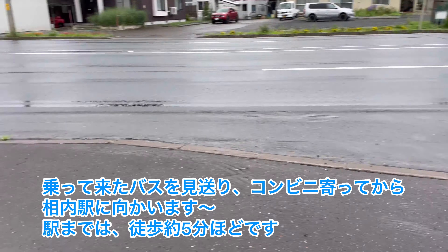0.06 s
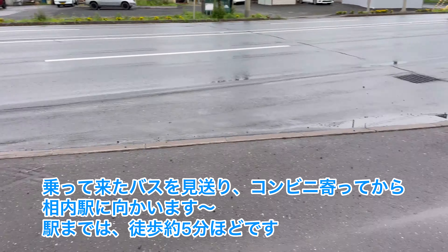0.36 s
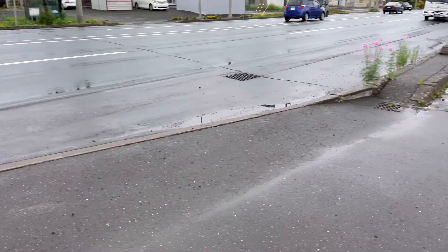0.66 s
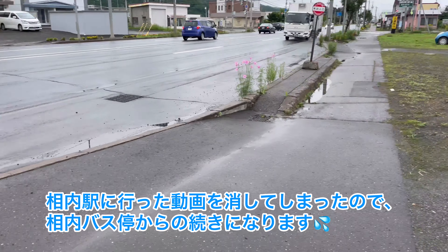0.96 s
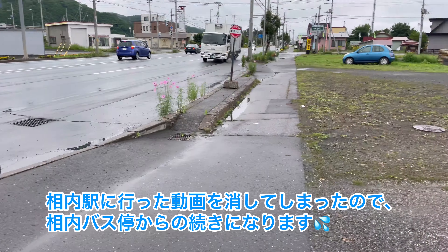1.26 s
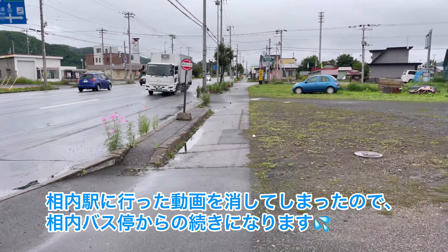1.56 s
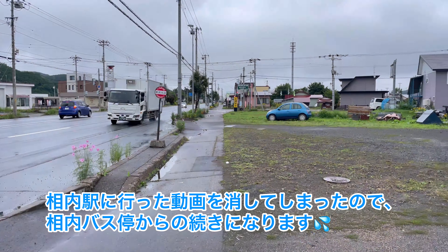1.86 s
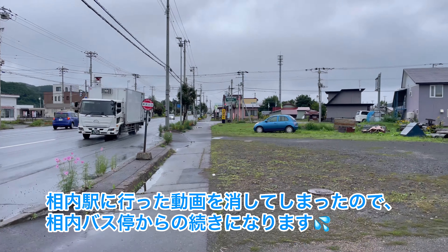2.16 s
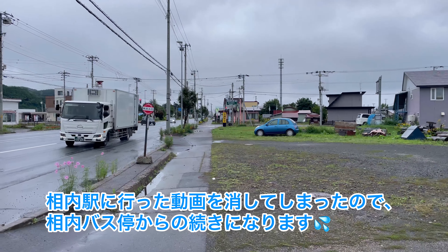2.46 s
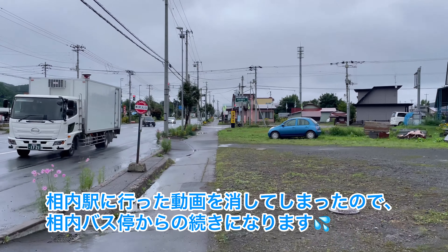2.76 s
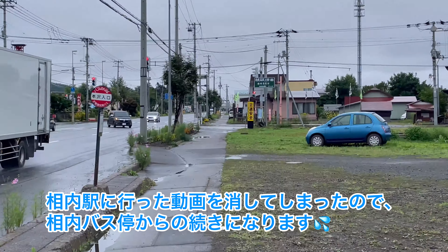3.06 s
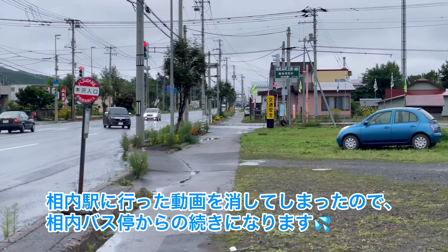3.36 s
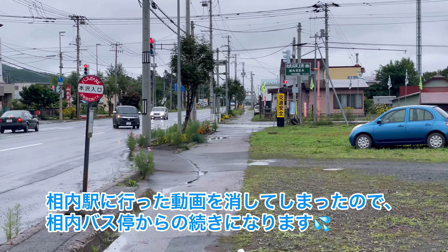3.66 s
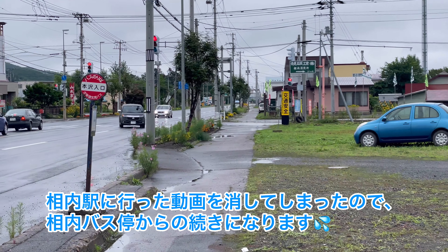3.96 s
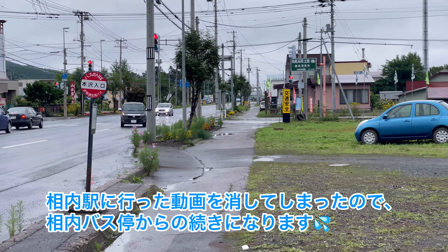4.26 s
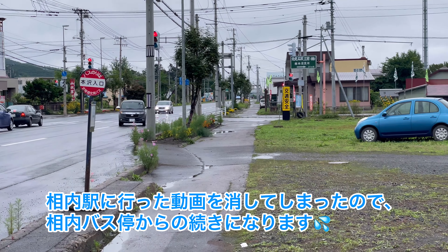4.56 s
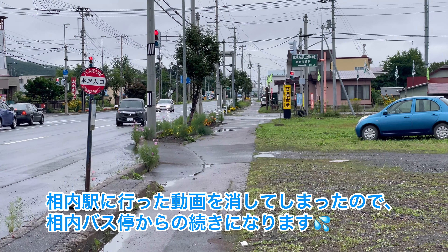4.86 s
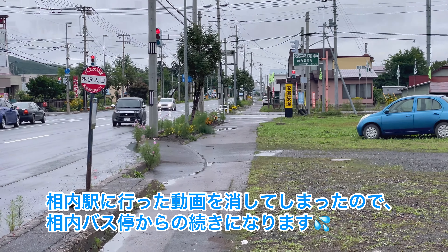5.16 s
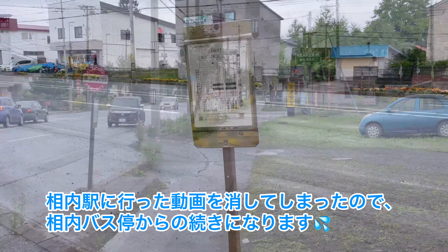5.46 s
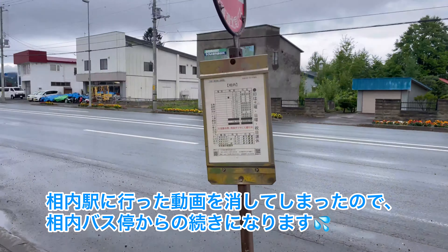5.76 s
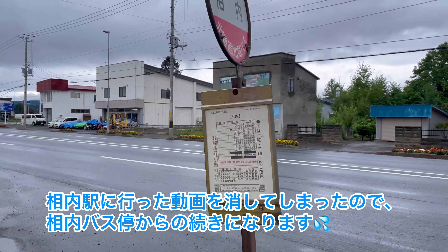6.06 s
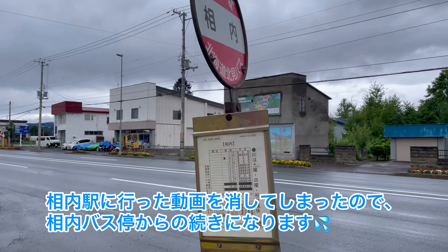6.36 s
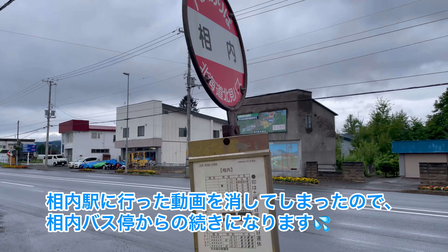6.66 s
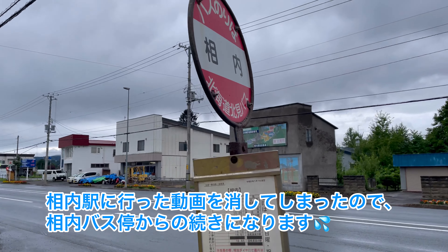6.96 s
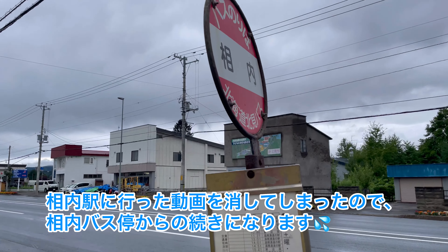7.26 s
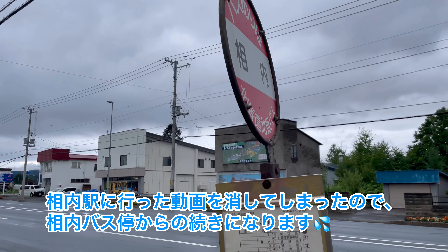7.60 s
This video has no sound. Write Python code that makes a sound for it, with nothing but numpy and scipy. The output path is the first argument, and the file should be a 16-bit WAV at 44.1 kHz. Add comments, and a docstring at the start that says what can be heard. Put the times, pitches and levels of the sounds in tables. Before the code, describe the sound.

At the start a bus pulls away on the left, its engine humming and growling over wet tyre hiss. The hum rises until about 0.8 seconds, then sags and is gone by 1.7, while a small car swishes faintly past. From about 1 second a truck approaches on the wet road, its hollow, sweeping tyre hiss and low rumble growing steadily. A diesel hum and a hoarse gear whine join in by 3 seconds. The truck is loudest and closest at around 4 to 4.8 seconds, with roaring tyres, bright spray and short spits of water and grit, the sharpest near 3.9. The whine drops in pitch as it passes. Around 5 seconds the truck fades and a following car's tyres hiss briefly. From about 5.8 seconds to the end, only quiet distant traffic drones and hisses. Soft, low wind thumps nudge the microphone now and then.

```python
"""A truck passes on a wet road

From the pavement, a hand-held phone hears a bus drone away on the left, then turns past a small car towards a
box truck. The truck passes close by: its diesel hums, its gears whine, its body rumbles and its tyres roar,
hiss and spray. The holder's body throws back a short echo that sweeps with the turn. The next car comes through
as the truck leaves; then the scene changes to steady far traffic. Water and grit spit, and wind nudges the
microphone."""
import sys
import numpy as np
from scipy import signal
from scipy.fft import rfft, irfft
from scipy.io import wavfile
from scipy.ndimage import uniform_filter1d, map_coordinates

SR = 44100
rng = np.random.default_rng(int(sys.argv[2]) if len(sys.argv) > 2 else 0)


def put_to_file(sound):
    """Save the sound as 16-bit audio at rate SR, in the file named by the first command-line argument."""
    columns = np.atleast_2d(sound).T  # one column per channel
    safe = np.clip(columns, -1, 1)
    whole_steps = np.round(safe * 32767)
    wavfile.write(sys.argv[1], SR, whole_steps.astype(np.int16))


N = 336483
T = np.arange(N) / SR
HZ = np.fft.rfftfreq(N, 1 / SR)

# Sound from ahead and from the left. Each row: frequency in Hz, left channel's lead in radians. The last rows,
# above about 12 kHz, only set how the topmost treble lines up between the channels.
FROM_AHEAD = [(0, 0), (1030, 1.4), (1460, 0.3), (1890, -0.1), (2930, 0.5), (5170, 0.6), (5770, -1.6),
              (6890, -0.6), (7490, -2.2), (7920, -2.1), (8350, -3.0), (12200, -5.4), (12600, -6.3),
              (15200, -6.3)]
FROM_LEFT = [(0, 0), (450, 0.5), (1200, 3.5), (2500, 5.5), (3500, 8.5), (4200, 5.5), (5300, 8), (5700, 3),
             (6700, 10), (7300, 3.5), (8600, 2.5), (12000, 5), (12600, -39.5)]
# How much louder the left channel is. Each row: frequency in Hz, left minus right in dB.
LEFT_BOOST = [(60, 3), (250, 2.5), (700, 3.5), (1300, 2.5), (2300, 0.5), (8000, 0)]
# The tone colour of each noise. Each row: frequency in Hz, relative level in dB.
FAR_DRONE = [(22, -28), (38, -5), (68, 1.5), (115, -7), (170, 1.5), (240, 2), (330, 0.5), (420, -9),
             (620, -5.5), (800, -2.5), (930, -4), (1080, -6.5), (1500, -11.5), (2200, -14.5)]
FAR_HISS = [(1000, -22), (1300, 1), (1650, -3.5), (2150, -0.5), (2800, -3.5), (3600, -8), (4500, -7),
            (5300, -7), (5900, -13), (7500, -11), (9300, -11), (11500, -13), (13000, -23), (15500, -38)]
BUS_HISS = [(900, -25), (1200, 6), (1650, 4.5), (2500, 1.5), (3400, -5.5), (4000, -4), (5100, -15),
            (5700, -11), (6500, -6), (7400, -4.5), (8500, -19), (9800, -6.5), (11500, -12), (13000, -28),
            (15500, -33)]
SMALL_CAR_TYRES = [(700, -20), (950, 6.5), (1150, 3), (1500, -13), (2100, -5), (2900, -23), (4000, -22)]
NEXT_CAR_TYRES = [(800, -22), (1050, 7), (1320, 7), (1700, 3), (2400, -4), (3400, -6), (4300, -9),
                  (5200, -8), (5900, -11), (7500, -16), (11500, -15), (14000, -32)]
BODY_RUMBLE = [(20, -30), (30, -21), (40, -6), (60, -0.5), (85, 4.5), (160, 1), (190, -2.5), (250, -10.5),
               (400, -49)]
TYRE_ROAR = [(130, -30), (200, -1), (270, 3), (420, -5), (540, -7), (720, -5), (1020, -5.5), (1250, -11),
             (2000, -51)]
TREAD_HISS = [(700, -36), (1050, -8), (1350, 1), (2050, 1), (2800, -2.5), (3700, -4), (5200, -6),
              (5700, -16.5), (8000, -38)]
SPRAY_HISS = [(4000, -24), (5200, -0.5), (5750, 1.5), (6600, 2.5), (7400, 1), (8000, 2), (9300, 4.5),
              (11500, -3.5), (13000, -7.5), (15500, -20)]
# Far cars hissing. Each row: time in seconds, level in dB, treble boost in dB, echo delay in ms.
FAR_CARS = [(5.6, -43.5, 1.5, 1.66), (6.2, -49, 3, 1.36), (6.55, -50.5, 0, 1.54), (6.85, -52, 1, 1.53),
            (7.1, -51.5, 2, 1.58), (7.35, -52.5, 0, 1.7), (7.63, -53, 1, 1.62)]
# Wind on the microphone. Each row: time in seconds, peak in dB, pitch in Hz, decay in seconds.
WIND_THUMPS = [(.33, -19.5, 80.5, 0.038), (.95, -17, 70, 0.073), (1.328, -21, 86, 0.028),
               (1.509, -28, 57.8, 0.027), (2.519, -22, 70, 0.038), (2.76, -23, 91, 0.088),
               (2.92, -24.5, 86.6, 0.055), (4.52, -18.5, 55, 0.12), (5.08, -27, 85, 0.056),
               (5.778, -27, 79.2, 0.019), (5.79, -33.5, 180, .04), (5.89, -33, 59.6, 0.055),
               (6.96, -41, 70, .035)]
# Water and grit. Each row: start in seconds, peak in dB, pitch in Hz, width in Hz, decay in seconds.
SPLASHES = [(.052, -26, 2800, 3000, .004), (.842, -25, 1950, 550, .009), (3.861, -12.8, 3000, 4200, .008),
            (3.897, -19, 3100, 900, .012), (4.275, -22, 2950, 450, .015), (4.345, -20, 2700, 300, .048),
            (4.54, -26.5, 3800, 400, .13), (4.8, -24, 2100, 500, .035), (6.970, -38, 2600, 800, .006),
            (6.985, -39.5, 4300, 1500, .008)]
# The echo off the holder's body. Each row: time in seconds, delay in ms, strength as a factor.
BODY_ECHO = [(.2, .62, .1), (.5, .74, .35), (.84, 1.02, .44), (1.0, 1.12, .48), (1.3, 1.35, .46),
             (1.48, 1.46, .68), (1.8, 1.48, .7), (2.0, 1.55, .75), (2.3, 1.57, .78), (2.6, 1.53, .78),
             (2.8, 1.51, .42), (3.6, 1.48, .32), (4.15, 1.48, 0)]
# The bus pulling away. Each row: time in seconds, firings per second, level in dB.
BUS_REVS = [(0.0, 95.1, -33), (0.3, 95.26, -32.5), (0.44, 99.1, -28), (0.62, 103.4, -28.5),
            (0.8, 105.2, -27), (1.12, 101, -30.5), (1.35, 85.8, -37), (1.52, 79.3, -36)]
# The bus's exhaust tones. Each row: multiple of the firing rate, relative level in dB.
BUS_TONES = [(.5, -12), (1, -1), (1.5, -13), (2, -17), (2.25, -17), (2.5, -18), (3, -15), (4, -24)]
# The truck's six cylinders fire three times a turn. Each row: multiple of the shaft rate, level in dB.
TRUCK_TONES = [(2, -8), (3, 1), (4, -2.5), (5, -8), (6, -13), (7, -4.5), (11, -14)]
# Air ringing in the tread grooves. Each row: pitch in Hz, width in Hz, relative level in dB.
GROOVES = [(1448, 260, 0.5), (1995, 260, -3.5)]
# The tread's sliding sizzle. Each row: time in seconds, pitch in Hz, level against the hiss in dB.
SIZZLE = [(.7, 5308, -27), (.95, 4410, -5.5), (1.15, 3946, -2.5), (1.5, 3214, -1.5), (1.85, 3300, -12),
          (2.3, 3400, -13), (2.6, 3402, -3), (2.95, 3297, -3.5), (3.3, 3124, -9), (4.3, 2740, -10),
          (5.3, 2440, -26)]
# Wetter patches of road. Each row: middle and half length in seconds, then the change in dB
# of the rumble, the tread hiss and the groove ring.
WET_PATCHES = [(1.3, .45, 1, 3, -3.5), (2.555, 0.23, .5, 2.5, 3.5), (2.92, .3, 4, 0.9, 4.5)]

TRUCK_M_PER_S, NEAREST_M = 13.64, 8.5
WHEELS_S, SPRAY_S, BODY_S, EXHAUST_S = 4.32, 4.39, 4.45, 4.6  # when each part of the truck is nearest


def undb(db):
    """Turn decibels into a factor to multiply by."""
    return 10 ** (np.asarray(db) / 20)


def unit(x):
    """Scale a sound so that the average of its channels has a typical size (rms) of 1."""
    return x / np.std(np.atleast_2d(x).mean(axis=0))


def curves(table):
    """Join a table's rows with straight lines in time: one curve per value column."""
    times, *columns = np.transpose(table)
    return [np.interp(T, times, column) for column in columns]


def ramp(start_s, length_s):
    """A straight rise from 0 to 1."""
    return np.clip((T - start_s) / length_s, 0, 1)


def swell(middle_s, half_s):
    """A smooth rise to 1 and fall."""
    return np.exp(-((T - middle_s) / half_s) ** 2)


def burst(start_s, rise_s, decay_s):
    """A level that jumps up and dies away."""
    age = np.maximum(T - start_s, 0)
    return (1 - np.exp(-age / rise_s)) * np.exp(-np.minimum(age / decay_s, 50))


def wander(per_s):
    """A smooth random drift, roughly between -1 and 1."""
    step = max(int(SR / per_s), 2)
    jagged = np.interp(np.arange(N) / step, np.arange(2048), rng.standard_normal(2048))
    return 1.3 * uniform_filter1d(jagged, step // 2)


def noise():
    """White noise: an even hiss."""
    return rng.standard_normal(N)


def band(hz, width_hz):
    """Noise around one pitch; the narrower it is, the more it sounds like a note."""
    smooth = signal.butter(2, width_hz / 2, fs=SR, output="sos")
    flutter = signal.sosfilt(smooth, noise() + 1j * noise())
    tone = np.exp(2j * np.pi * np.cumsum(hz * np.ones(N)) / SR)
    return unit(np.real(flutter * tone))


def droplets(per_s, scatter_db):
    """Tiny drops landing, a few much louder than the rest."""
    hits = rng.random(N) < per_s / SR
    return unit(hits * np.sign(noise()) * undb(scatter_db * np.minimum(rng.exponential(size=N), 5)))


def response(points):
    """The gain at every frequency, from (Hz, dB) points."""
    hz, db = np.transpose(points)
    return undb(np.interp(np.log(HZ + 1), np.log(hz), db))


def stereo(x, gain=1, direction=FROM_AHEAD):
    """A sound from one direction reaches the two channels with different timing and level."""
    lead = np.exp(.5j * np.interp(HZ, *np.transpose(direction))) * np.sqrt(response(LEFT_BOOST))
    spectrum = rfft(x) * gain
    return irfft(np.array([spectrum * lead, spectrum / lead]), N)


def wash(x, colour, ahead, scattered, alike_hz=380):
    """Coloured noise from ahead or the left, plus scattered noise with alike bass in both channels."""
    low_hz, high_hz = colour[0][0], colour[-1][0]
    gain = response(colour) / (1 + (HZ / high_hz) ** 4) * (1 - np.exp(-(HZ / low_hz) ** 2))
    direct = np.sqrt(ahead) * stereo(x, gain)
    direct += np.sqrt(1 - ahead) * stereo(np.roll(x, N // 2), gain, FROM_LEFT)
    apart = HZ / np.hypot(HZ, alike_hz)
    mid = rfft(noise()) * np.sqrt(1 - apart ** 2 / 2)
    side = rfft(noise()) * apart / np.sqrt(2)
    tilt = np.sqrt(response(LEFT_BOOST))
    all_round = irfft(gain * np.array([(mid + side) * tilt, (mid - side) / tilt]), N)
    return np.sqrt(1 - scattered) * direct + np.sqrt(scattered) * all_round


def body_echo(x, delay_ms, strength, left=.75, right=1.05):
    """Two bounces off the holder, dulled by clothing, cancel some pitches and hollow the sound."""
    dulled = uniform_filter1d(x.mean(axis=0), size=5)
    first, second = (map_coordinates(dulled, [np.arange(N) - ms * SR / 1000], order=3, mode="nearest")
                     for ms in (delay_ms, delay_ms + .48))
    echo = strength * np.array([[left], [right]]) * (first + .25 * second)
    return (x + echo) / np.sqrt(1 + strength ** 2)


def facing(middle_s=.74, ease_s=.3):
    """How far the phone has turned towards the truck, from 0 to 1."""
    return 1 / (1 + np.exp((middle_s - T) / ease_s))


def distance(nearest_s):
    """Metres to a part of the truck."""
    return np.hypot(TRUCK_M_PER_S * (T - nearest_s), NEAREST_M)


def passing_db(nearest_s, level_db, doubling_db, shade_db_per_s):
    """A part loses doubling_db each time its distance doubles; once past, the truck can shade it."""
    doublings = np.log2(distance(nearest_s) / NEAREST_M)
    return level_db - doubling_db * doublings - shade_db_per_s * np.maximum(T - nearest_s, 0)


def engine(hz, tones, wobble, throb_db):
    """Tones driven by one slightly unsteady shaft, each throbbing by itself."""
    angle = 2 * np.pi * np.cumsum(hz * (1 + wobble * wander(24.71))) / SR
    note = sum(undb(db + throb_db * wander(14)) * np.sin(multiple * angle + 2 * np.pi * rng.random())
               for multiple, db in tones)
    return unit(stereo(note))


def far_traffic():
    """A steady drone and tyre hum down the road, with the wet hiss of cars that come and go."""
    drone = unit(wash(noise(), FAR_DRONE, ahead=0, scattered=.44)) * undb(-40.5 + .5 * wander(12))
    hum = band(832 * (1 + .02 * wander(2.8)), width_hz=150)
    hum = stereo(hum, .66, FROM_LEFT) * undb(-47 + 2 * wander(7))
    hiss_db, treble_db, echo_ms = curves(FAR_CARS)
    water = noise() + .31 * droplets(per_s=430, scatter_db=3)
    hiss = unit(body_echo(wash(water, FAR_HISS, ahead=0, scattered=.59), echo_ms, strength=.4))
    treble = irfft(rfft(hiss) * HZ ** 4 / (HZ ** 4 + 6000 ** 4), N)
    hiss = (hiss + treble * (undb(treble_db) - 1)) * undb(hiss_db + .64 * wander(14))
    sizzle = band(4650 * (1 + .037 * wander(4)), width_hz=570)
    sizzle = stereo(sizzle, 1, FROM_LEFT) * undb(-61 + 2.9 * wander(6)) * swell(6.5, .7)
    return (drone + hum + hiss + sizzle) * np.sqrt(ramp(5.53, .28))


def wind():
    """Moving air nudges the microphone with soft, low thumps."""
    thumps = [(band(hz, width_hz=55) * burst(time_s - .01, .015, decay_s), peak_db)
              for time_s, peak_db, hz, decay_s in WIND_THUMPS]
    return stereo(sum(x / np.abs(x).max() * undb(peak_db) for x, peak_db in thumps))


def splashes():
    """Water and grit spit and squeak under the tyres."""
    spits = [(band(hz, width_hz) * burst(start_s, decay_s / 2, decay_s), peak_db)
             for start_s, peak_db, hz, width_hz, decay_s in SPLASHES]
    return stereo(sum(x / np.abs(x).max() * undb(peak_db) for x, peak_db in spits))


def small_car():
    """Tyres on the far lane swell and fade as the phone turns past them."""
    tyres = wash(noise(), SMALL_CAR_TYRES, facing(), scattered=.43)
    return unit(body_echo(tyres, *curves(BODY_ECHO))) * undb(-42.5) * swell(.97, .8)


def next_car():
    """The wet tyres of the car behind come through as the truck leaves."""
    tyres = unit(wash(noise(), NEXT_CAR_TYRES, ahead=.89, scattered=.36))
    return tyres * undb(-38 + .8 * wander(14)) * ramp(4.92, .34) * (1 - ramp(5.48, .36))


def bus():
    """The exhaust hum rises and sags, the engine growls as it pulls, and body and tyres fade away."""
    firing_hz, hum_db = curves(BUS_REVS)
    hum = engine(firing_hz, BUS_TONES, wobble=.004, throb_db=1.2) * undb(hum_db)
    growl_colour = [(170, 3), (240, 6.5), (370, 3), (510, 6.5), (660, -5), (1000, -30)]
    surge_db = 4 * (swell(.2, .091) + swell(.61, .16))
    growl = unit(wash(noise(), growl_colour, ahead=0, scattered=.54)) * undb(-37.5 - 6 * T + surge_db)
    rumble = unit(wash(noise(), BODY_RUMBLE, ahead=.22, scattered=.35)) * undb(-34)
    roar = unit(wash(noise(), TYRE_ROAR, ahead=0, scattered=.44)) * undb(-45)
    hiss = unit(wash(noise(), BUS_HISS, ahead=0, scattered=.48)) * undb(-42)
    return hum * (1 - ramp(1.44, .26)) + growl + (rumble + roar + hiss) * (1 - ramp(.74, .85))


def truck_gears(whine_hz=462.4, sound_m_per_s=343):
    """Gears whine hoarsely at two pitches an octave apart, which drop as they go by (Doppler effect)."""
    away_m_per_s = np.gradient(distance(WHEELS_S)) * SR
    hz = whine_hz / (1 + away_m_per_s / sound_m_per_s)
    whine = unit(stereo(band(hz / 2, width_hz=32) + .74 * band(hz, width_hz=16)))
    whine_db = passing_db(WHEELS_S, level_db=-37, doubling_db=0, shade_db_per_s=18)
    return whine * undb(whine_db) * ramp(2.32, .59)


def truck_diesel(climb_hz_per_s=2.1):
    """The diesel slowly speeds up; its firing note stands out as the tailpipe comes into view."""
    shaft_hz = 41.62 + climb_hz_per_s * (T - EXHAUST_S)
    tailpipe_db = 4 * swell(4.88, .14)
    tones = [(multiple, db + (multiple == 3) * tailpipe_db) for multiple, db in TRUCK_TONES]
    note = engine(shaft_hz, tones, wobble=.011, throb_db=2)
    note_db = passing_db(EXHAUST_S, level_db=-25, doubling_db=8.5, shade_db_per_s=6)
    note_db -= 24 * np.maximum(T - 4.98, 0)  # soon only the low boom carries back
    boom = engine(shaft_hz, [(1, 0)], wobble=.01, throb_db=1.5)
    boom_db = passing_db(EXHAUST_S, level_db=-31.5, doubling_db=8, shade_db_per_s=6)
    return (note * undb(note_db) + boom * undb(boom_db)) * (1 - ramp(5.72, .23))


def tread_hiss(ahead, scattered, wet_ring_db):
    """Water squeezed from the tread hisses and sizzles, and the grooves ring; all duller once past."""
    past_s = np.maximum(T - WHEELS_S, 0)
    water = noise() + .23 * droplets(per_s=1600, scatter_db=8)
    hiss = unit(wash(water, TREAD_HISS, ahead, scattered))
    treble = irfft(rfft(hiss) * response([(2100, -16), (3100, -2.5), (4300, -2), (6500, 5.5)]), N)
    treble_db = 3.3 - 9 * past_s + wander(21.47)  # the treble comes in uneven spurts
    hiss += treble * (undb(treble_db) - 1)
    sizzle_hz, sizzle_db = curves(SIZZLE)
    sizzle_gain = undb(sizzle_db)
    sizzle = band(sizzle_hz, width_hz=1040) * sizzle_gain * undb(1.3 * wander(20))
    ring_gain = ahead * undb(-6 - 42 * past_s + wet_ring_db)
    ring = sum(undb(db + 1.9 * wander(10)) * band(hz * (1 + .02 * wander(4)), width_hz)
               for hz, width_hz, db in GROOVES)
    mix = hiss + stereo(sizzle + unit(ring) * ring_gain, gain=.96)
    return mix / np.sqrt(1 + sizzle_gain ** 2 + ring_gain ** 2)


def truck_wheels(distant_m=24.7):
    """Rolling on the wet road: the body rumbles, and the tyres roar, hiss and throw up a mist."""
    wet_rumble_db, wet_tread_db, wet_ring_db = sum(
        np.outer(changes_db, swell(middle_s, half_s)) for middle_s, half_s, *changes_db in WET_PATCHES)
    ahead, echo = facing(), curves(BODY_ECHO)
    # From far away, much of the sound arrives scattered.
    scattered = .036 + .76 / (1 + (distant_m / distance(WHEELS_S)) ** 4)

    rumble_db = passing_db(BODY_S, level_db=-26, doubling_db=4.5, shade_db_per_s=-1) + wet_rumble_db
    wake_db = 1.5 * swell(4.5, .2)  # the truck's tail shakes the air
    rumble = unit(wash(noise(), BODY_RUMBLE, ahead, scattered, alike_hz=260))
    rumble *= undb(rumble_db + wake_db + .39 * wander(8.6))

    roar_db = passing_db(EXHAUST_S, level_db=-24.5, doubling_db=4, shade_db_per_s=2.5)
    roar = wash(noise(), TYRE_ROAR, ahead, np.clip(scattered + .23, 0, 1))
    roar = unit(body_echo(roar, *echo, left=.37, right=.091)) * undb(roar_db)

    tread_db = passing_db(WHEELS_S, level_db=-28, doubling_db=3, shade_db_per_s=1.7) + wet_tread_db
    tread = unit(body_echo(tread_hiss(ahead, scattered, wet_ring_db), *echo))
    tread *= undb(tread_db + .19 * wander(25.06))

    spray_db = passing_db(SPRAY_S, level_db=-31.5, doubling_db=5.5, shade_db_per_s=8.5)
    mist = noise() + .75 * droplets(per_s=2500, scatter_db=3)
    spray = unit(wash(mist, SPRAY_HISS, ahead, scattered * .037)) * undb(spray_db + .96 * wander(20))

    away_db = -8.5 * (1 - ahead)  # hiss is lost while the phone points away
    return (rumble + roar * undb(away_db / 2) + (tread + spray) * undb(away_db)) * (1 - ramp(5, .82))


def scene():
    """Everything on the road, added together."""
    return (bus() + small_car() + truck_diesel() + truck_gears() + truck_wheels()
            + next_car() + far_traffic() + splashes() + wind())


def record(dry):
    """The phone cuts the deepest bass and the highest treble."""
    bass_cut = signal.butter(6, 30, "high", fs=SR, output="sos")
    treble_cut = signal.ellip(10, .2, 80, 15550, fs=SR, output="sos")
    return signal.sosfilt(treble_cut, signal.sosfilt(bass_cut, dry))


dry = scene()
out = record(dry)
put_to_file(out)
```